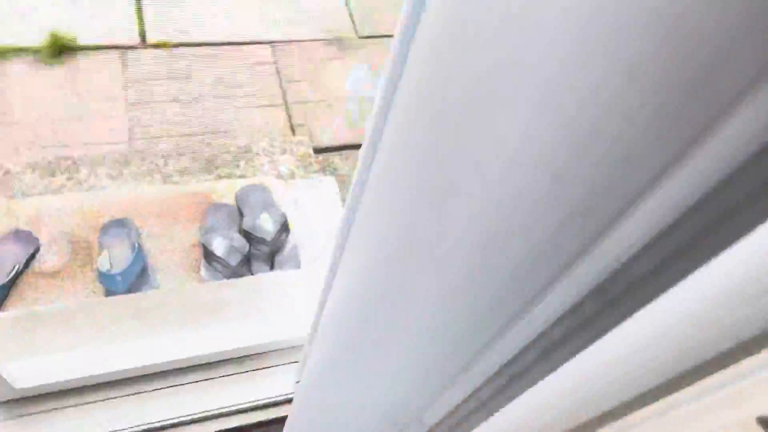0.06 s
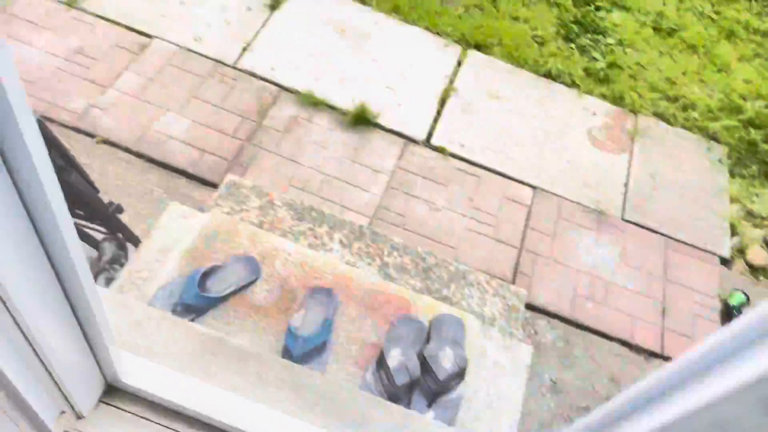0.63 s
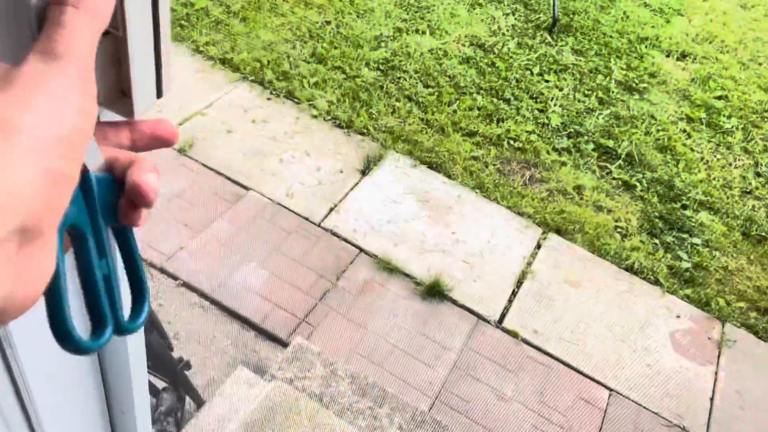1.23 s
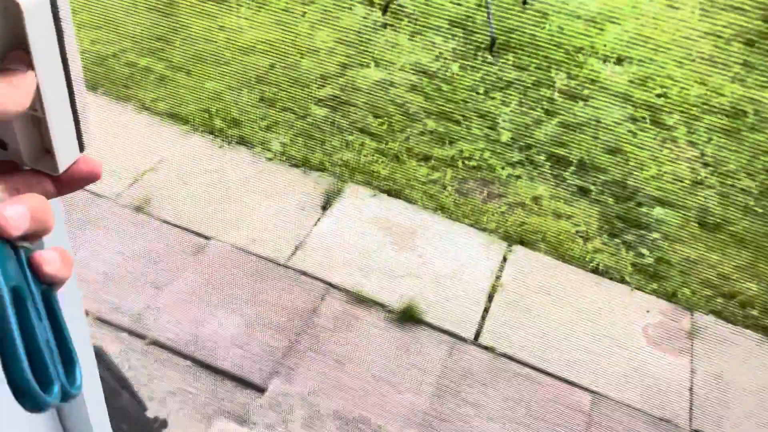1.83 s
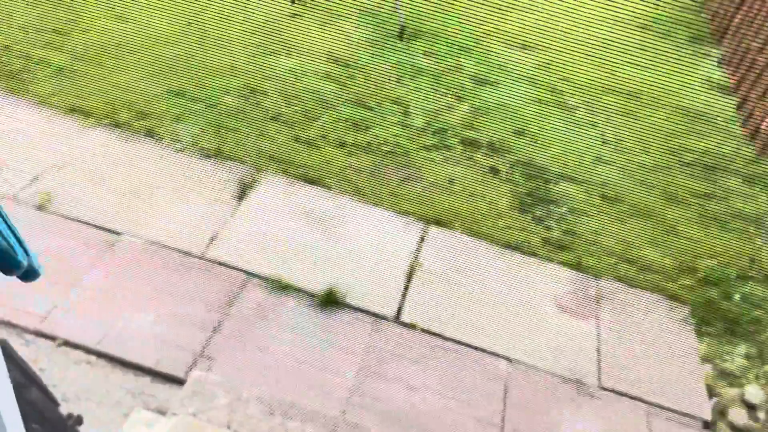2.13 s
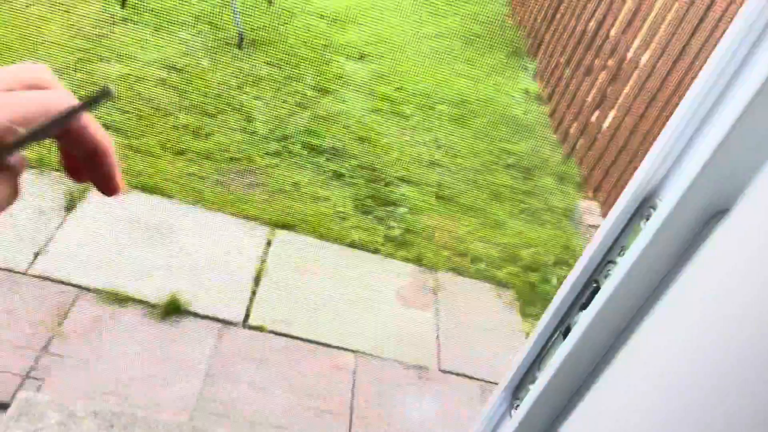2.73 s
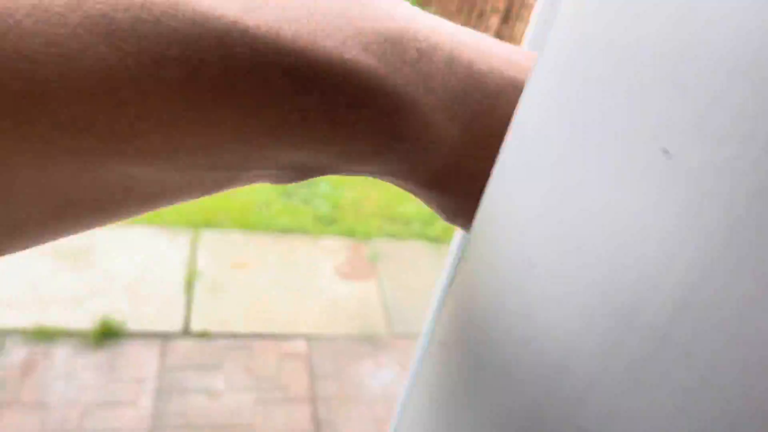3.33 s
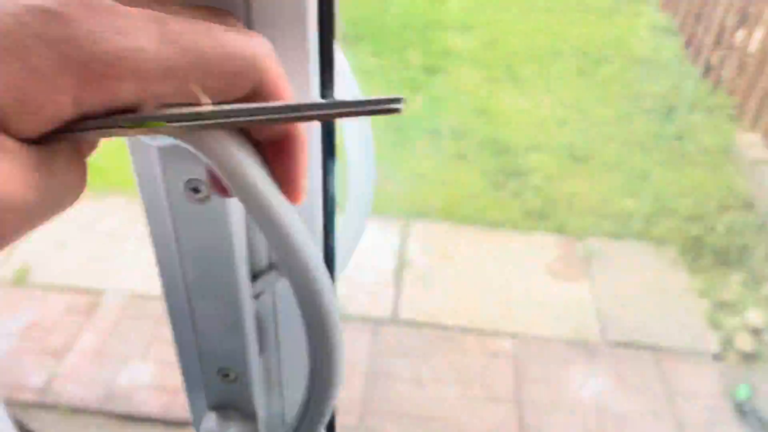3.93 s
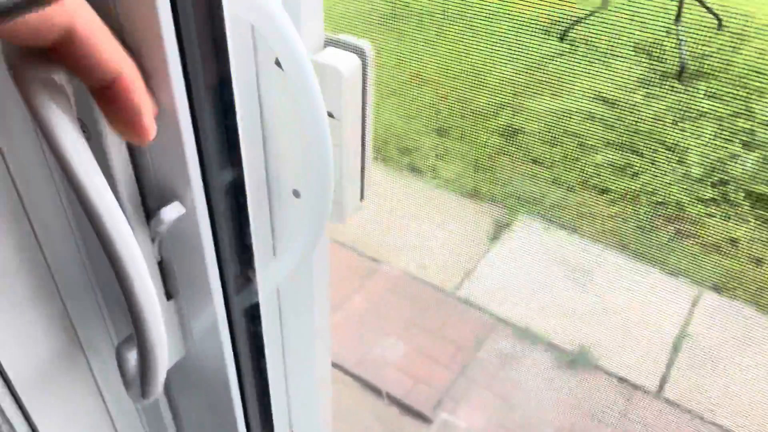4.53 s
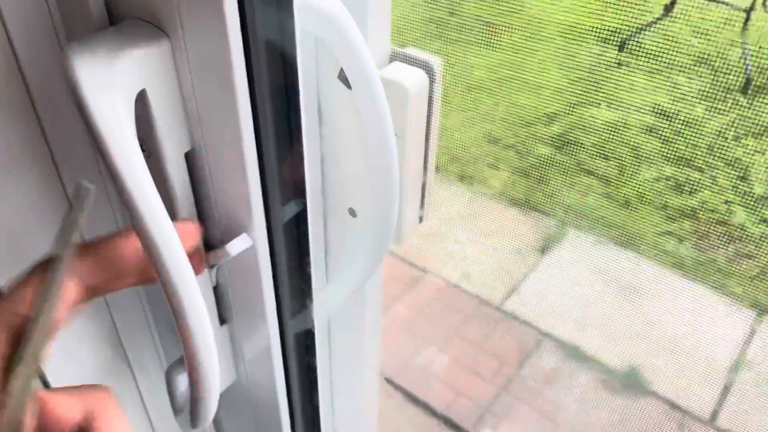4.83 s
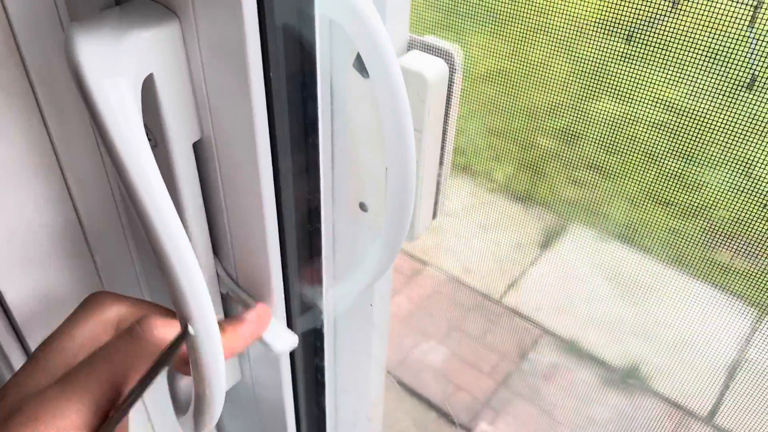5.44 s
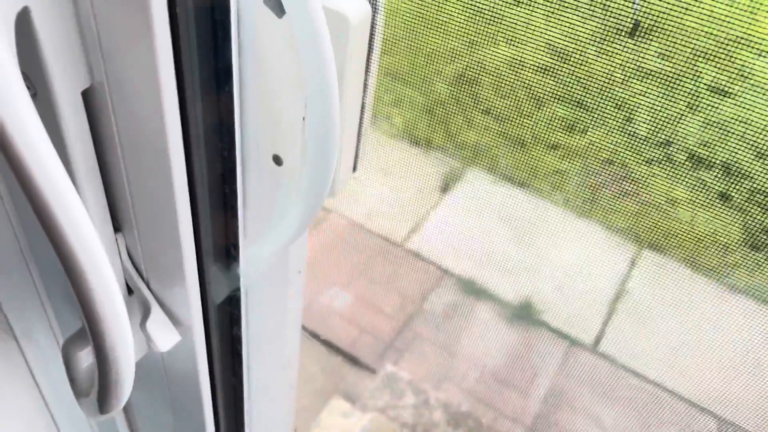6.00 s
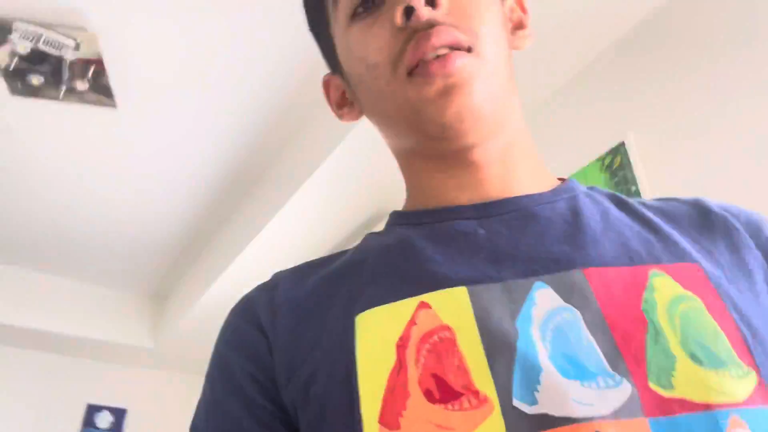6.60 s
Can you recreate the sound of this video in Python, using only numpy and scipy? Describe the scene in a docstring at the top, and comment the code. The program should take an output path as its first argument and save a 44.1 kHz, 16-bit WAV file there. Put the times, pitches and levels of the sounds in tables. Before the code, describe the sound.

A sliding glass patio door rolls briefly on gritty wheels and bangs against its stop. A hand knocks about the screen door, which clicks, then snaps shut with a short scrape. The glass door rumbles back, thuds into the jamb with a low boom, and its latch is flicked over. Everything is close to the microphone at the doorway, with a little room echo and faint garden air.

```python
"""A glass patio door rumbles open on gritty wheels and bangs against its stop, close to the microphones. A hand
knocks about the screen door and snaps it shut. The glass door rolls back, thuds into the jamb and its latch is
flicked over. Each blow sets the struck part ringing; shoves make the heavy pane boom. We stand at the doorway,
the room echoing behind. Garden air hisses over a distant rumble; at the very end the scene changes to a still
room."""
import sys
import numpy as np
from scipy import signal
from scipy.fft import rfft, irfft, next_fast_len
from scipy.io import wavfile

SR = 44100
rng = np.random.default_rng(int(sys.argv[2]) if len(sys.argv) > 2 else 0)


def transcribe(signal):
    """Save signal, clipped to [-1, 1], as a 16-bit WAV file at the path in sys.argv[1]."""
    frames = np.atleast_2d(signal).T
    limited = np.clip(frames, -1, 1)
    pcm = np.round(limited * 32767).astype(np.int16)
    wavfile.write(sys.argv[1], SR, pcm)


N = 293876
TIME = np.arange(N) / SR


def from_db(db):
    return 10 ** (np.asarray(db) / 20)


def unit_rms(x):
    return x / np.sqrt(np.mean(x ** 2) + 1e-20)


def at_hz(points, hz):
    """Each column of a table, read on a log-frequency axis."""
    knots, *columns = np.transpose(points)
    return [np.interp(np.log(np.maximum(hz, 1)), np.log(knots), c) for c in columns]


def add(track, s, sound):
    """Mix a sound into a track from time s on."""
    start = max(round(s * SR), 0)
    track[..., start:start + sound.shape[-1]] += sound[..., :N - start]


def drift(rate):
    """A random wander with rate new values a second; rms 1."""
    knots = rng.standard_normal(1024)
    return unit_rms(np.interp(TIME * rate, np.arange(len(knots)), knots))


def fade_after(s, release_s):
    return np.exp(-np.maximum(TIME - s, 0) / release_s)


def strokes(rows, attack_s, release_s):
    """The envelope of strokes that each rise, hold and die away."""
    return sum(from_db(db) * np.clip((TIME - s) / attack_s, 0, 1) * fade_after(s + hold_s, release_s)
               for s, hold_s, db in rows)


def colour(x, spectrum, tilt_db=0, size=4096):
    """Minimum-phase filter with the given spectrum, tilted by tilt_db an octave about 1 kHz."""
    hz = np.arange(size // 2 + 1) * SR / size
    db = at_hz(spectrum, hz)[0] + tilt_db * np.log2(np.maximum(hz, 200) / 1000)
    cepstrum = irfft(np.log(from_db(db)))
    cepstrum[1:size // 2] *= 2
    cepstrum[size // 2 + 1:] = 0
    response = irfft(np.exp(rfft(cepstrum)))
    return signal.oaconvolve(x, response[None], axes=1)[:, :x.shape[-1]]


def noise(spectrum, flutter_db=0, rate=20):
    """Two unrelated coloured noises with a common flutter; rms 1."""
    return unit_rms(colour(rng.standard_normal((2, N)) * from_db(flutter_db * drift(rate)), spectrum))


# edges of the bands, mostly an octave wide, that die away separately (f/Hz)
BAND_EDGES = [20, 180, 360, 720, 1400, 2800, 5600, 11000, 20000]
BANDS = [(np.sqrt(low * high), signal.butter(2, [low, high], "band", fs=SR, output="sos"))
         for low, high in zip(BAND_EDGES, BAND_EDGES[1:])]
def dying_noise(t, t60_at):
    """Two unrelated noises in which each band dies at its own rate: a crowd of close modes."""
    return sum(signal.sosfilt(band, rng.standard_normal((2, len(t))) * from_db(-60 * t / t60_at(hz))
                              + 1e-18) for hz, band in BANDS)


def ringing(modes, t, scatter_db, detune=0):
    """Struck modes; every blow shares its force among them a little differently."""
    chance = rng.standard_normal((len(modes), 2))
    return sum(from_db(db + scatter_db * a - 60 * t / t60) * np.sin(2 * np.pi * hz * (1 + detune * b) * t)
               for (hz, db, t60), (a, b) in zip(modes, chance))


def resonate(force, modes, length_s, scatter_db):
    """A running force keeps a part's modes ringing; rms 1."""
    ring = ringing(modes, np.arange(int(length_s * SR)) / SR, scatter_db)
    return unit_rms(signal.fftconvolve(force, ring[None], axes=1)[:, :N])


def disperse(x, travel_s):
    """Bending waves run slower the lower they are; travel_s scales their delay along the frame."""
    size = 2 * x.shape[-1]
    hz = np.arange(size // 2 + 1) * SR / size
    cycles = travel_s * (2 * np.sqrt(1000 * hz) - hz / 3)
    return irfft(rfft(x, size) * np.exp(-2j * np.pi * cycles), size)[:, :size // 2]


def contacts(rows, spectrum, modes, gain_db, crack_db, crack_s, modes_db,
             ring_t60, dull_linger, bass_linger, travel_s):
    """Each blow: a crack, a crowd of short modes and the part's own tones. Dull blows ring longer."""
    out, t = np.zeros((2, N)), np.arange(SR // 5) / SR
    middle_hz = np.median([hz for hz, _, _ in modes])
    for s, db, tilt_db in rows:
        t60 = ring_t60 * np.exp(-dull_linger * tilt_db)
        body = dying_noise(t, lambda hz: t60 * (hz / 2000) ** -bass_linger)
        crack = from_db(crack_db) * rng.standard_normal((2, len(t))) * np.exp(-t / crack_s)
        blow = colour(body + crack, spectrum, tilt_db)
        blow /= np.sqrt(np.mean(blow[:, :SR // 100] ** 2, axis=1, keepdims=True))  # first 10 ms: rms 1
        reached = [(hz, mode_db + min(tilt_db * np.log2(hz / middle_hz), 0), ring)
                   for hz, mode_db, ring in modes]
        blow[0] += from_db(modes_db) * ringing(reached, t, scatter_db=2, detune=.004)
        add(out, s, from_db(db + gain_db) * disperse(blow, travel_s))
    return out


def grit(per_s, spread_db, size_cap, decay_s):
    """Grains of uneven size pass under a wheel at random, each a short burst of noise."""
    hits = rng.random(N) < per_s / SR
    sizes = from_db(spread_db * np.minimum(rng.exponential(1, N), size_cap))
    jolts = signal.lfilter([1], [1, -np.exp(-1 / (decay_s * SR))], hits * sizes + 1e-18)
    return jolts * rng.standard_normal((2, N))


# spectrum of a coarse grain's tick (f/Hz, level/dB)
GRAIN_COLOUR = [(200, -22), (700, -2.5), (1200, 5), (2200, -2.5), (3500, -10.5), (5500, -12), (8000, -20),
                (16000, -33.5)]
# modes of the glass door's frame (f/Hz, level/dB, t60/s)
DOOR_MODES = [(390, -8, .13), (528, -11, .17), (577, -18, .13), (639, -13, .13), (686, -13, .12),
              (828, -19, .08), (963, -19, .08), (1100, -16, .08), (1242, -20, .08), (2233, -18, .085),
              (2955, -21, .1), (3596, -22, .1)]
def coarse_grains():
    """A wheel cracks over coarser grains: small ticks that set the door's frame ringing; rms 1."""
    bursts = grit(per_s=77, spread_db=1.5, size_cap=3, decay_s=.0033)
    ring = resonate(bursts, DOOR_MODES, length_s=.25, scatter_db=4.5)
    return unit_rms(unit_rms(colour(bursts, GRAIN_COLOUR)) + from_db(2.5) * ring)


# pushes of the glass door (start/s, stop/s, run-up/s, rumble gain/dB, initial sway/dB)
PUSHES = [(-.02, 0.358, 0.0074, -39.5, -62), (3.301, 4.488, 0.42, -33.5, -56)]
# spectrum of the wheels on fine grit (f/Hz, level/dB)
WHEEL_COLOUR = [(60, -11), (160, -9), (250, -3.5), (380, -5.5), (600, -8.5), (1200, -14.5), (2200, -24),
                (5000, -33.5), (16000, -53.5)]
# spectrum of the swaying pane (f/Hz, level/dB)
SWAY_COLOUR = [(25, -21), (42, 0), (57, 4), (75, -4.5), (92, -6.5), (150, -8.5), (300, -28), (2000, -87.5)]
# modes of the track (f/Hz, level/dB, t60/s)
TRACK_MODES = [(197, -9, .3), (252, -1, .16), (277, -4, .16), (372, -2.5, .14)]
def rolling_door():
    """Close by, wheels run over grit; as the door travels its drone sinks, sway and track ring grow."""
    drone_hz, sag_hz_per_s = 420.6, 160
    track_db, track_db_per_s, sway_db_per_s = -49.5, 12, 23
    fine_grit = grit(per_s=3000, spread_db=-7.5, size_cap=4, decay_s=.0052)
    wheels = from_db(-3) * unit_rms(colour(fine_grit, WHEEL_COLOUR))
    ticks = from_db(-11.5) * coarse_grains()
    pane = noise(SWAY_COLOUR)
    slow = signal.butter(2, 38, fs=SR, output="sos")
    waver = unit_rms(signal.sosfilt(slow, rng.standard_normal((2, N))))
    track = resonate(rng.standard_normal((2, N)), TRACK_MODES, length_s=.5, scatter_db=-2.5)
    out = 0
    for start_s, stop_s, run_up_s, rumble_db, sway_db in PUSHES:
        rolled_s = np.clip(TIME, start_s, stop_s) - start_s
        speed = (1 - np.exp(-(rolled_s / run_up_s) ** 1.54)) * fade_after(stop_s, .14)
        pitch = drone_hz - sag_hz_per_s * rolled_s
        drone = from_db(-7.5) * waver * np.sin(2 * np.pi * np.cumsum(pitch) / SR)
        depth = (330 / pitch) ** 1.1  # the sinking drone gains on the grit
        rumble = (wheels + speed ** 2 * ticks) / depth ** 1.48 + drone * depth ** .9
        ring = from_db(track_db + track_db_per_s * rolled_s) * track
        sway = from_db(sway_db + sway_db_per_s * rolled_s) * pane
        out += speed * (ring + from_db(rumble_db) * rumble + sway)
    return out


# course of the distant rumble (t/s, level/dB)
RUMBLE_LEVELS = [(0.0, -49.5), (2.03, -50), (2.25, -51), (3.0, -48.5), (6.3, -47.5)]
# its spectrum (f/Hz, level/dB)
RUMBLE_COLOUR = [(20, -27.5), (35, -17.5), (54, 2), (85, -5), (150, -5), (330, -11.5), (600, -20.5),
                 (1200, -24), (3000, -30), (16000, -64)]
# course of the outdoor hiss (t/s, relative level/dB)
HISS_LEVELS = [(0.0, -53), (1.79, -55.5), (2.22, -53), (3.19, -52.5), (4.35, -48), (5.77, -51.5),
               (5.9, -53.5)]
# its spectrum (f/Hz, level/dB)
HISS_COLOUR = [(100, -22.5), (600, -16), (1000, -6.5), (1500, -7), (2000, -2.5), (2500, 2), (3700, -1),
               (5500, 1), (7500, -7.5), (10000, -1.5), (12500, -8), (14500, -7), (16000, -4.5)]
# spectrum of the soft garden air (f/Hz, level/dB)
AIR_COLOUR = [(100, -11), (400, 4.5), (1000, -2.5), (2500, -1), (5500, -2.5), (8000, -17), (16000, -23.5)]
def garden():
    """Out front: a far rumble with a wavering hum, soft air, and a bright hiss that dies down first."""
    hum_hz, hiss_until_s, garden_until_s = 117.5, 5.93, 6.325
    hum = np.sin(2 * np.pi * hum_hz * TIME + 1.3 * drift(9)) * from_db(2 * drift(3.4))
    far = noise(RUMBLE_COLOUR, flutter_db=2.5, rate=11) + from_db(-5.5) * np.sqrt(2) * hum
    rumble = from_db(np.interp(TIME, *np.transpose(RUMBLE_LEVELS))) * far
    hiss_gain = from_db(2.5 + np.interp(TIME, *np.transpose(HISS_LEVELS)))
    hiss = hiss_gain * fade_after(hiss_until_s, .029) * noise(HISS_COLOUR, flutter_db=1.7, rate=6.56)
    air = from_db(-58) * noise(AIR_COLOUR, flutter_db=-.1, rate=9)
    return (rumble + hiss + air) * fade_after(garden_until_s, .015)


# shoves on the open door (t/s, strength/dB, centre f/Hz)
OPEN_SHOVES = [(0.046, -30.5, 63.4), (0.3635, -8.5, 235), (.379, -15, 96), (.899, -31.5, 186),
               (4.408, -27, 106)]
# modes of the pane standing open (f/Hz, level/dB, t60/s)
OPEN_PANE_MODES = [(58, -4, .3), (96, -2, .25), (186, -8, .25), (222, -1, .26), (275, -16, .15),
                   (389, -9, .2)]
# shoves on the door in the jamb (t/s, strength/dB, centre f/Hz)
SHUT_SHOVES = [(4.4795, -8.5, 139), (4.509, -33, 250), (4.522, -15.5, 55), (4.562, -22, 64),
               (4.63, -25.5, 64), (4.86, -39, 125), (4.892, -25.5, 115), (5.254, -28, 117),
               (5.451, -37, 167), (5.845, -30, 144)]
# modes of the pane held by the jamb (f/Hz, level/dB, t60/s)
SHUT_PANE_MODES = [(56, -3, .27), (87, -4, .2), (101, -10, .2), (133, -17, .17), (149, -13, .45),
                   (186, -16, .22), (241, -4, .27)]
def pane_boom(shoves, modes, ring_db, swing_cycles=1.22):
    """Shoves swing the heavy pane and leave it ringing: soft ones reach low modes, hard ones higher."""
    out, t = np.zeros((2, N)), np.arange(SR // 2) / SR
    for s, db, centre_hz in shoves:
        reach = signal.butter(2, [centre_hz / 2, centre_hz * 2], "band", fs=SR, output="sos")
        swing = np.sin(2 * np.pi * centre_hz * t) * np.exp(-centre_hz * t / swing_cycles)
        ring = from_db(ring_db) * ringing(modes, t, scatter_db=-.5)
        add(out[0], s, from_db(db) * signal.sosfilt(reach, swing + ring))
    return out


# knocks on the frame (t/s, relative level/dB, tilt/dB per octave)
FRAME_KNOCKS = [(.058, -22.5, -3), (.168, -29, -2), (.311, -28.5, -3.5), (.8983, -12.5, 1.5),
                (.933, -25, 0), (1.0075, -19.5, -3), (1.013, -27, -0.5), (1.0283, -14, -1),
                (1.593, -28.5, -5.5), (2.114, -41, -19), (3.258, -34, -5), (4.247, -27, -2.5),
                (5.246, -29, -4.5), (5.444, -21, -1)]
# their spectrum (f/Hz, level/dB)
FRAME_COLOUR = [(60, -19.5), (200, -11.5), (450, 3.5), (750, 0), (1100, -2.5), (1500, -1.5), (2100, -1),
                (2800, -3.5), (4200, -10), (5800, -8), (8000, -22.5), (11000, -22.5), (16000, -24.5)]
# modes of the knocked frame (f/Hz, level/dB, t60/s)
FRAME_MODES = [(385, -10, .08), (500, -3, .06), (590, -10, .07), (920, -7, .045), (1090, 0, .045),
               (1180, -6, .035), (1625, -9, .05), (2450, -10, .022), (3850, -15, .025), (5800, -14, .02)]
def frame_knocks():
    """Hand and screen door knock on the frame, near the microphones."""
    return contacts(FRAME_KNOCKS, FRAME_COLOUR, FRAME_MODES, gain_db=-15, crack_db=16.5, crack_s=.00033,
                    modes_db=1, ring_t60=.054, dull_linger=.06, bass_linger=.36, travel_s=.0007)


# blows on the stop (t/s, relative level/dB, tilt/dB per octave)
STOP_BLOWS = [(.357, -22, 4.5), (.3615, -7, 0.5), (.3635, -8.5, -1.5), (.3675, -11.5, 0)]
# their spectrum (f/Hz, level/dB)
STOP_COLOUR = [(60, -24.5), (200, -0.5), (300, -5), (400, -2), (520, -0.5), (720, -1), (950, -6),
               (1150, -5.5), (1700, -11.5), (2800, -18.5), (4000, -15), (5500, -10.5), (8000, -26),
               (11000, -22.5), (16000, -38.5)]
# rebounds in the guides (t/s, relative level/dB, tilt/dB per octave)
REBOUNDS = [(.378, -14, 0.5), (.3815, -13, 2.5), (.3958, -15, -1.5), (.4058, -18.5, -0.5), (.409, -21, -4)]
# their spectrum (f/Hz, level/dB)
REBOUND_COLOUR = [(60, -29), (250, -4), (520, 0), (800, 1), (1200, -7.5), (1800, -6.5), (2900, -1.5),
                  (4400, -9.5), (5700, -12), (8000, -14.5), (11000, -13), (16000, -27)]
def stop_bang():
    """The glass door hits its stop, rebounds and rattles in its guides."""
    bang = contacts(STOP_BLOWS, STOP_COLOUR, DOOR_MODES, gain_db=-7.5, crack_db=10.5, crack_s=.00032,
                    modes_db=1.5, ring_t60=.048, dull_linger=.04, bass_linger=.054, travel_s=.0011)
    rattle = contacts(REBOUNDS, REBOUND_COLOUR, DOOR_MODES, gain_db=-6.5, crack_db=10, crack_s=.0006,
                      modes_db=-4.5, ring_t60=.06, dull_linger=.03, bass_linger=.13, travel_s=.00095)
    return bang + rattle


# light scuffs and scrapes (t/s, hold/s, level/dB)
SCUFFS = [(.58, 0.049, -45), (1.37, 0.036, -53), (1.422, 0.03, -44.5), (2.243, .012, -30),
          (3.125, 0.044, -48.5), (4.655, 0.039, -44.5), (5.375, 0.094, -48.5)]
# their spectrum (f/Hz, level/dB)
SCUFF_COLOUR = [(300, -6), (1800, -16), (2700, -11.5), (3400, -3), (4000, -9), (4700, -16), (5500, -13),
                (9000, -25), (16000, -41)]
def light_scuffs():
    """Brief, light, bright scuffs and scrapes around the doors."""
    return strokes(SCUFFS, attack_s=.014, release_s=.019) * noise(SCUFF_COLOUR, flutter_db=4, rate=51)


# clicks of the catch (t/s, relative level/dB, tilt/dB per octave)
CATCH_CLICKS = [(1.4503, -11.5, 1.5), (1.4555, -29.5, 0)]
# their spectrum (f/Hz, level/dB)
CATCH_COLOUR = [(60, -18), (220, -22), (400, -5), (750, 2), (1200, 2), (2100, -3.5), (2800, -21),
                (4100, -17), (5500, -12.5), (8000, -14), (12000, -17), (16000, -24)]
# modes of the catch (f/Hz, level/dB, t60/s)
CATCH_MODES = [(382, -4, .09), (770, -7, .06), (900, -7, .04), (1174, -1, .045), (1480, -4, .035),
               (2110, -8, .04), (2945, -14, .05), (3682, -12, .05), (5300, -10, .025)]
def screen_catch():
    """The screen door's catch lets go with a click."""
    return contacts(CATCH_CLICKS, CATCH_COLOUR, CATCH_MODES, gain_db=-14, crack_db=14, crack_s=.00032,
                    modes_db=-3, ring_t60=.053, dull_linger=.039, bass_linger=.28, travel_s=.00073)


# rubs of the hand (t/s, hold/s, level/dB)
RUBS = [(2.11, 0.3, -47.5), (2.6, 0.16, -52.5), (5.02, 0.082, -46), (5.24, 0.42, -41), (5.83, 0.16, -50.5)]
# their spectrum (f/Hz, level/dB)
RUB_COLOUR = [(40, -16), (110, 0), (250, -1), (380, -3), (600, -15), (1300, -21), (2500, -29), (16000, -60)]
def hand_rubs():
    """A hand rubs dully on frame and handle."""
    return strokes(RUBS, attack_s=.0036, release_s=.12) * noise(RUB_COLOUR, flutter_db=2.5, rate=40)


# clacks of the screen door (t/s, relative level/dB, tilt/dB per octave)
SCREEN_CLACKS = [(2.2548, -21.5, 1.5), (2.258, -7.5, -1), (2.2612, -13, 10), (2.2648, -9, -3.5),
                 (2.274, -25.5, -8)]
# their spectrum (f/Hz, level/dB)
SCREEN_COLOUR = [(60, -15.5), (300, -33.5), (900, -13), (1800, -10.5), (2800, 0.5), (4000, 5), (5500, -9),
                 (9000, -11), (12000, -20), (16000, -35.5)]
# modes of the screen door (f/Hz, level/dB, t60/s)
SCREEN_MODES = [(690, -15, .06), (890, -12, .06), (1370, -10, .06), (1930, -6, .04), (2600, -7, .025),
                (2800, -3, .025), (3650, -7, .018), (3850, -3, .022), (4450, -11, .018)]
def screen_snap():
    """At close range the screen door snaps shut in a bright cluster of blows."""
    return contacts(SCREEN_CLACKS, SCREEN_COLOUR, SCREEN_MODES, gain_db=-11, crack_db=8.5, crack_s=.0027,
                    modes_db=-3, ring_t60=.069, dull_linger=.052, bass_linger=.19, travel_s=.00043)


# scrape of the screen frame (t/s, hold/s, level/dB)
SCRAPES = [(2.392, 0.059, -33)]
# its spectrum (f/Hz, level/dB)
SCRAPE_COLOUR = [(60, -5), (200, -5.5), (380, -2.5), (520, -3.5), (660, -2.5), (1100, -12), (1900, -10.5),
                 (4000, -20.5), (8000, -35), (10500, -30), (13000, -45), (16000, -36)]
# rasp of the runner (t/s, hold/s, level/dB)
RASPS = [(2.42, .015, -45.5)]
# its spectrum (f/Hz, level/dB)
RASP_COLOUR = [(3000, -25), (8000, -22), (10300, 6), (11200, -8), (12000, -7), (13500, -22), (16000, -28)]
def screen_scrape():
    """The screen frame scrapes back in its track and its runner rasps thinly."""
    scrape = noise(SCRAPE_COLOUR, flutter_db=-1.5, rate=68)
    rasp = noise(RASP_COLOUR, flutter_db=3.5, rate=140)
    return (strokes(SCRAPES, attack_s=.0098, release_s=.074) * scrape
            + strokes(RASPS, attack_s=.006, release_s=.017) * rasp)


# chafes of the door's edge (t/s, hold/s, level/dB)
CHAFES = [(3.525, .015, -51), (3.708, 0.02, -46), (3.765, 0.02, -47), (3.852, .012, -46),
          (3.99, 0.025, -47.5), (4.132, 0.0086, -52), (4.2, 0.032, -43.5), (4.235, 0.03, -43),
          (4.394, 0.011, -44)]
# their spectrum (f/Hz, level/dB)
CHAFE_COLOUR = [(300, -15), (750, -12), (1000, 9), (1200, 1), (1420, 5.5), (1700, -6), (2000, -4),
                (2900, -7), (4000, -1), (4700, -20), (5500, -1), (7500, -16), (12000, -12), (16000, -40)]
def edge_chafes():
    """The closing door's edge chafes in its guide."""
    return strokes(CHAFES, attack_s=.0031, release_s=.013) * noise(CHAFE_COLOUR, flutter_db=1, rate=120)


# dents passing under the wheels (t/s, level/dB)
DENTS = [(3.624, -33.5), (3.769, -30), (4.005, -33), (4.127, -25.5), (4.245, -28), (4.303, -25)]
def wheel_bumps():
    """The wheels drop over dents, each giving the track a soft knock."""
    out, t = np.zeros((2, N)), np.arange(SR // 2) / SR
    onset = 1 - np.exp(-t / .0034)
    for s, db in DENTS:
        add(out[0], s, from_db(db) * onset * ringing(TRACK_MODES, t, scatter_db=-2.5, detune=.0091))
    return out


# squeak of a wheel (t/s, hold/s, level/dB)
SQUEAKS = [(4.365, 0.014, -41)]
# its spectrum (f/Hz, level/dB)
SQUEAK_COLOUR = [(3500, -34), (4900, -12), (5400, -5), (6000, -3), (7000, -13), (10000, -35)]
def wheel_squeak():
    """A dry wheel chirps in a narrow treble band."""
    return strokes(SQUEAKS, attack_s=.006, release_s=.005) * noise(SQUEAK_COLOUR, flutter_db=-4, rate=300)


# taps on the handle (t/s, relative level/dB, tilt/dB per octave)
HANDLE_TAPS = [(4.396, -27.5, 0), (4.819, -36, 8), (4.849, -23.5, -3), (5.06, -35.5, -1), (5.197, -33.5, 4)]
# their spectrum (f/Hz, level/dB)
HANDLE_COLOUR = [(60, -17), (400, -4), (800, 1.5), (1200, -8), (2000, 1), (2800, -16), (6000, -34),
                 (16000, -44)]
# modes of the handle (f/Hz, level/dB, t60/s)
HANDLE_MODES = [(700, -4, .08), (1157, -6, .05), (1879, -8, .04), (2266, -11, .04)]
def handle_taps():
    """Light, dry taps ring the handle briefly."""
    return contacts(HANDLE_TAPS, HANDLE_COLOUR, HANDLE_MODES, gain_db=-11.5, crack_db=17, crack_s=.00053,
                    modes_db=3, ring_t60=.054, dull_linger=.02, bass_linger=.33, travel_s=.00077)


# blows on the jamb (t/s, relative level/dB, tilt/dB per octave)
JAMB_BLOWS = [(4.4805, -12, -8), (4.4835, -15, 1), (4.4885, -10, 0.5), (4.496, -14, 1.5),
              (4.5075, -13, -4.5), (4.528, -18.5, -5.5)]
# their spectrum (f/Hz, level/dB)
JAMB_COLOUR = [(60, -1.5), (200, 0), (420, -7.5), (750, -6.5), (1300, -4.5), (1900, -9), (2800, -2.5),
               (4500, -11), (6500, -11), (8500, -19.5), (11000, -18.5), (16000, -45)]
# modes of the jamb (f/Hz, level/dB, t60/s)
JAMB_MODES = [(490, -12, .12), (802, -17, .1), (926, -15, .09), (1290, -21, .05), (2229, -19, .04),
              (2500, -13, .025), (2719, -9, .025), (3391, -18, .03)]
def jamb_crunch():
    """The glass door crunches into the jamb in a quick run of blows."""
    return contacts(JAMB_BLOWS, JAMB_COLOUR, JAMB_MODES, gain_db=-6.5, crack_db=5, crack_s=.00052,
                    modes_db=1, ring_t60=.083, dull_linger=.017, bass_linger=.27, travel_s=.00065)


# clicks of the latch (t/s, relative level/dB, tilt/dB per octave)
LATCH_CLICKS = [(5.281, -20, -2), (5.348, -14, -0.5), (5.3503, -17.5, 3), (5.352, -17.5, 3),
                (5.432, -34, 1.5), (5.479, -30, -5.5)]
# their spectrum (f/Hz, level/dB)
LATCH_COLOUR = [(60, -8), (300, -14), (800, -7.5), (1600, -4.5), (3700, -10.5), (5800, -4), (8000, -20),
                (11000, -17), (16000, -32)]
# modes of the latch (f/Hz, level/dB, t60/s)
LATCH_MODES = [(715, -9, .075), (1240, -10, .04), (1453, -1.5, .05), (1820, -3.5, .055), (2080, -5, .035),
               (2260, -7, .035), (2950, -9, .03), (3350, -7, .03), (3800, -2, .032), (4950, -10, .025),
               (5636, -7, .03)]
def latch_flick():
    """The latch lever clicks over, close to the microphones."""
    return contacts(LATCH_CLICKS, LATCH_COLOUR, LATCH_MODES, gain_db=-13, crack_db=10, crack_s=.00068,
                    modes_db=2.5, ring_t60=.04, dull_linger=.067, bass_linger=.17, travel_s=.00079)


# spectrum of the room tone (f/Hz, level/dB)
STILL_COLOUR = [(20, -16), (70, -2), (130, -3.5), (250, -11), (520, -16.5), (1100, -31.5), (2800, -30.5),
                (5000, -46), (9000, -54), (16000, -65.5)]
# a faint tick indoors (t/s, hold/s, level/dB)
TICKS = [(6.381, 0.0064, -53.5)]
# its spectrum (f/Hz, level/dB)
TICK_COLOUR = [(300, -12), (1400, -14), (1900, 4), (2500, -14), (3800, -19), (5000, -24), (16000, -45)]
def still_room(start_s=6.355):
    """Indoors: faint, dull room tone, unrelated left and right, and one small tick."""
    onset = np.clip((TIME - start_s) / .005, 0, 1)
    tone = from_db(-52.5) * onset * noise(STILL_COLOUR, flutter_db=1, rate=12)
    return tone + strokes(TICKS, attack_s=.0035, release_s=.014) * noise(TICK_COLOUR)


# spectrum of the room's echo (f/Hz, level/dB)
ECHO_COLOUR = [(150, 5), (500, -0.5), (900, -1.5), (1600, -1.5), (3000, -2), (5000, 0.5), (11000, -1.5)]
# its decay times (f/Hz, t60/s)
ECHO_T60 = [(100, 0.2), (500, 0.59), (3000, 0.64), (6000, 0.26), (14000, 0.24)]
def room_echo(x):
    """The room behind the microphones: a diffuse tail that builds up over the first reflections."""
    t = np.arange(SR * 3 // 4) / SR
    tail = dying_noise(t, lambda hz: at_hz(ECHO_T60, hz)[0]) * (1 - np.exp(-t / .0011))
    response = unit_rms(colour(tail, ECHO_COLOUR)) / np.sqrt(len(t))
    return signal.fftconvolve(x, response, axes=1)[:, :N]


# left-right likeness and lead by frequency, cancelling in the centre near 7.7 kHz
# (f/Hz, likeness/0-1, left lead/rad, left minus right/dB)
STEREO_IMAGE = [(60, .998, 0, -.3), (180, .992, 0, -1.5), (330, .955, .05, -2.6), (520, .78, .3, -3.9),
                (850, .5, .85, -.3), (1350, .5, .35, -.3), (2000, .6, .1, -.5), (3000, .6, 1, -.5),
                (5200, .62, .4, 0), (6400, .7, 1.8, 0), (7700, .993, 3.1, 0), (10000, .85, 5.6, 0),
                (11000, .93, 6.3, 0), (14000, .98, 9.4, 0), (16000, .85, 10.5, 0)]
def stereo_image(x):
    """Common (row 0) and diffuse (row 1) sound spread out: alike in bass, right lagging in treble."""
    size = 2 * next_fast_len(N // 2 + 2048)
    alike, lead, balance_db = at_hz(STEREO_IMAGE, np.arange(size // 2 + 1) * SR / size)
    alike = np.clip(alike, 0, .999)
    common, diffuse = rfft(x, size) * np.sqrt([(1 + alike) / 2, (1 - alike) / 2])
    left = (common + diffuse) * from_db(balance_db / 2)
    right = (common - diffuse) * from_db(-balance_db / 2) * np.exp(-1j * lead)
    return irfft(np.array([left, right]), size)[:, :N]


def scene():
    """From the doorway: door, screen and latch close by, the room behind, the garden in front."""
    bangs = stop_bang() + jamb_crunch()
    knocks = frame_knocks() + screen_catch()
    snap = screen_snap()
    clicks = latch_flick() + handle_taps()
    pane = pane_boom(OPEN_SHOVES, OPEN_PANE_MODES, ring_db=-9.5)
    pane += pane_boom(SHUT_SHOVES, SHUT_PANE_MODES, ring_db=-6)
    echo = room_echo(from_db(-16) * bangs + from_db(-16.5) * knocks
                     + from_db(-15) * snap + from_db(-15.5) * clicks)
    wheels = rolling_door() + wheel_bumps() + wheel_squeak()
    friction = screen_scrape() + hand_rubs() + light_scuffs() + edge_chafes()
    close_by = bangs + knocks + snap + clicks + pane + wheels + friction
    return stereo_image(close_by + echo + garden()) + still_room()


def record(dry):
    """A low cut at 40 Hz, the highest peaks rounded, the top cut at 16.2 kHz."""
    thinned = signal.sosfilt(signal.butter(6, 40, "high", fs=SR, output="sos"), dry)
    rounded = 1.1 * np.tanh(thinned / 1.1)
    return signal.sosfilt(signal.ellip(10, .1, 90, 16200, fs=SR, output="sos"), rounded)


dry = scene()
out = record(dry)
transcribe(out)
```